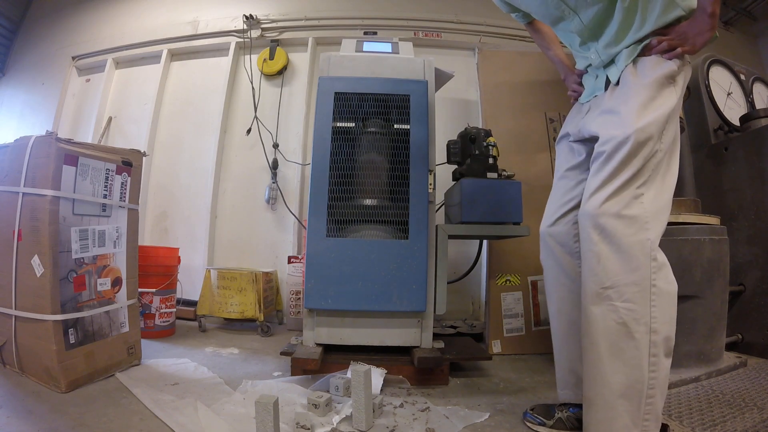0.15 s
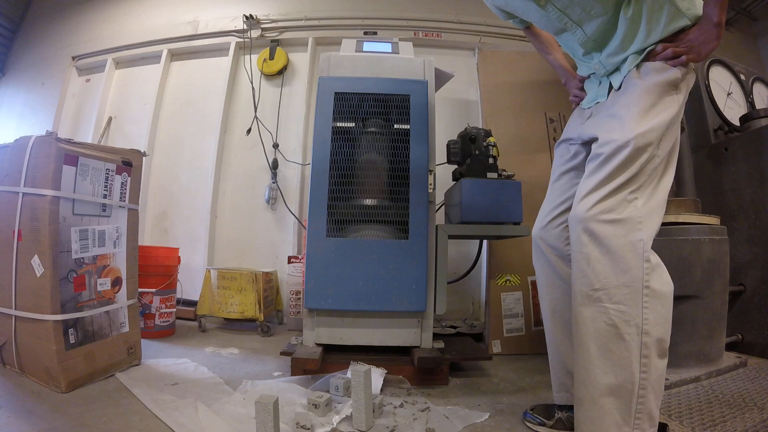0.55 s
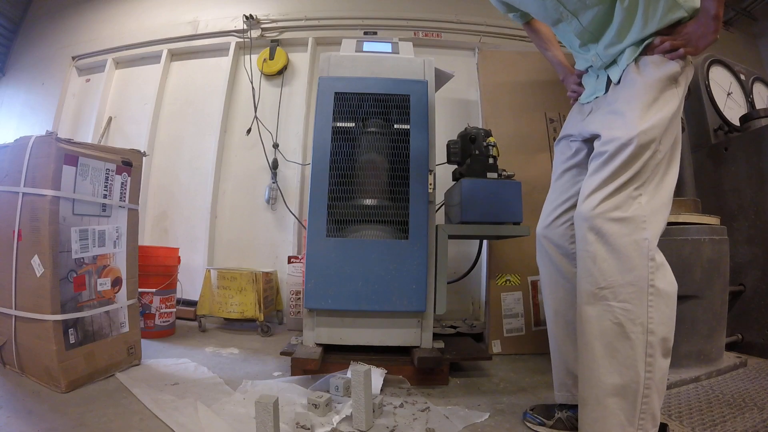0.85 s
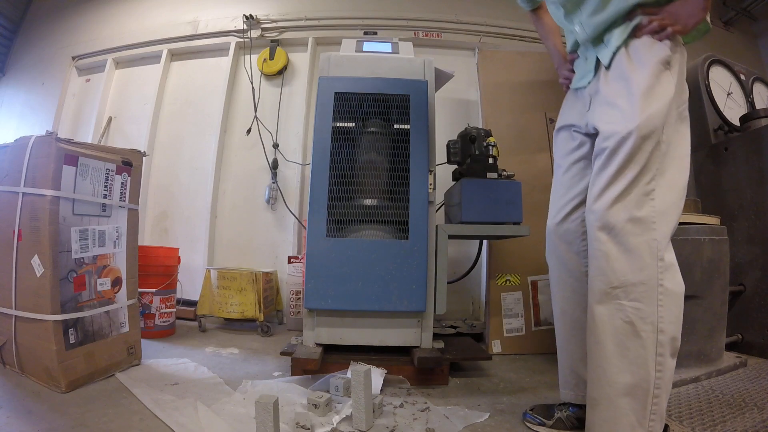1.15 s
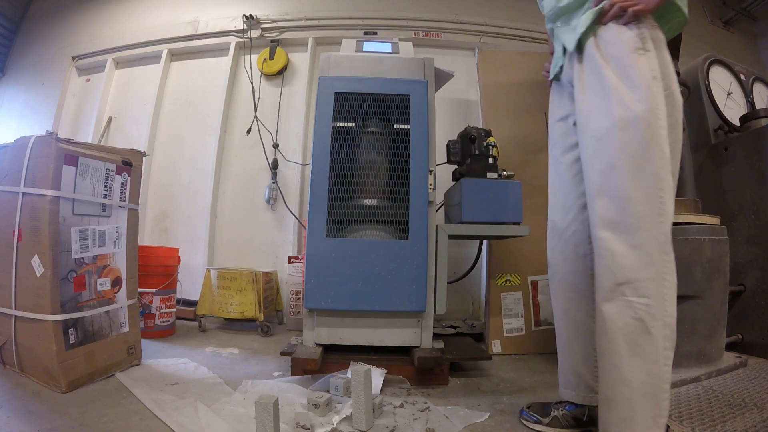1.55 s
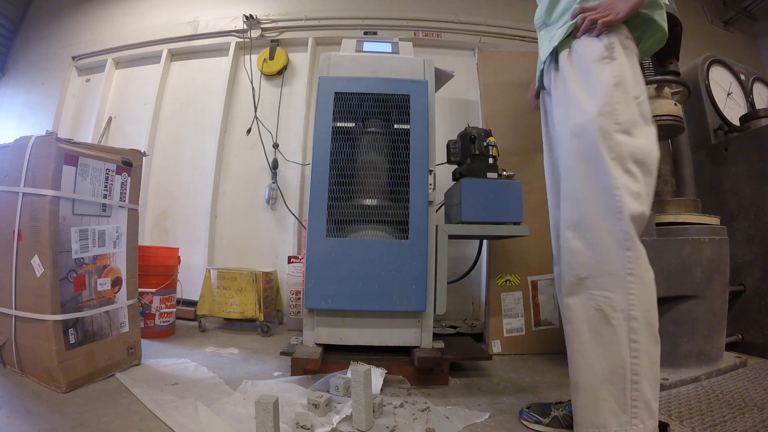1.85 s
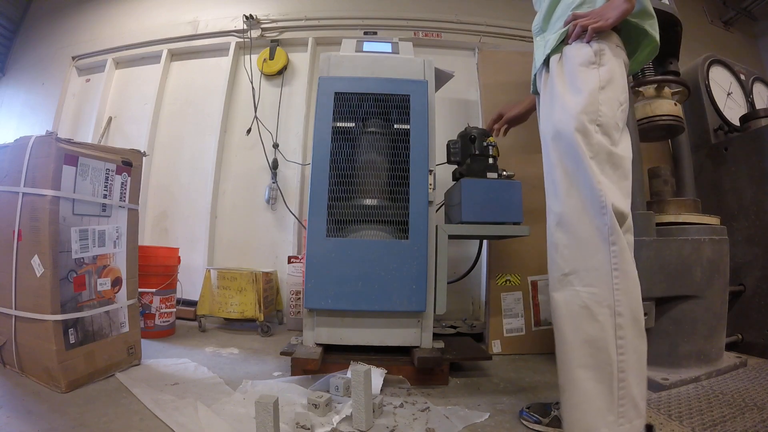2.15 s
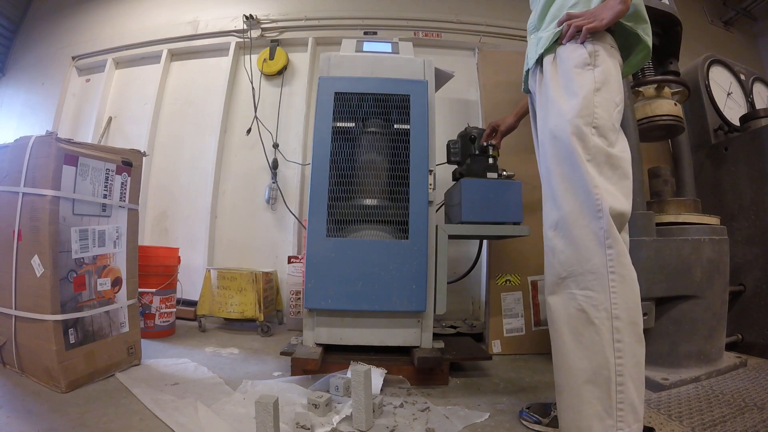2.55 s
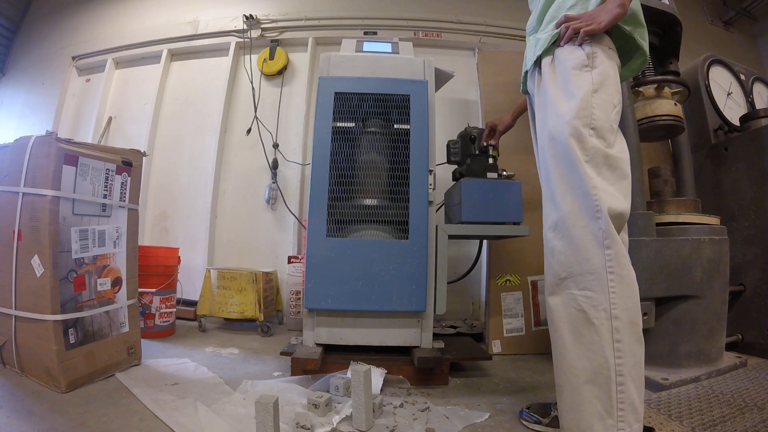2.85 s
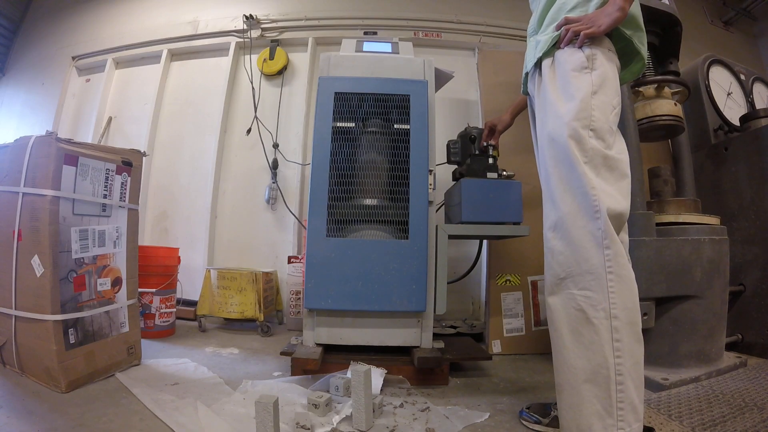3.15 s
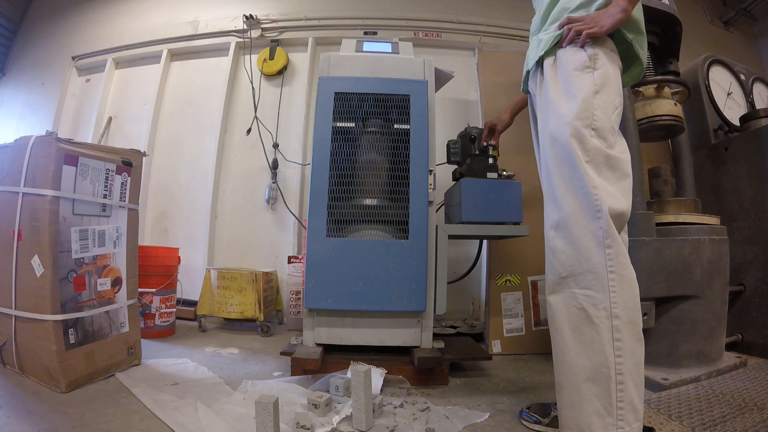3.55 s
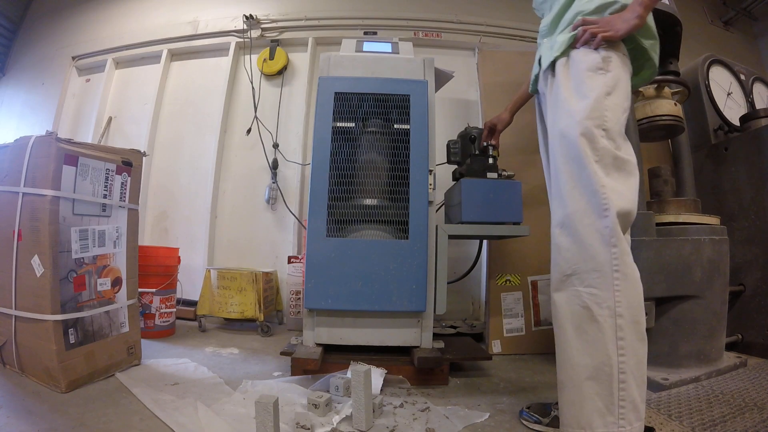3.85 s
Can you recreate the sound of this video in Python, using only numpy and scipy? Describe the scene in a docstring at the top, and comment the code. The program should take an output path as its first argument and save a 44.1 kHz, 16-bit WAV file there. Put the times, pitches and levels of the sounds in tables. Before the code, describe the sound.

A concrete cylinder bursts in a hydraulic press in a small workshop. From the start, the motor and pump hum steadily with a thin whine, easing slightly around 2 seconds. At about 3 seconds comes a loud, dull bang with a brief steel ring and short echo. Grit sprays and chunks thud down until about 3.3 seconds, trickling out by 3.8 seconds as the pump runs on.

```python
"""First comes the steady hum of a motor and hydraulic pump in a small workshop: a compression
tester is squeezing a concrete cylinder, and the piston tone eases as the load builds.
About three seconds in, the cylinder bursts with a bang that rings the steel frame.
Grit showers against the guard, bigger chunks thud down, and the pump runs on."""
import sys
import numpy as np
from scipy import signal
from scipy.fft import rfft, irfft, next_fast_len
from scipy.io import wavfile
from scipy.ndimage import map_coordinates

SR = 44100
rng = np.random.default_rng(int(sys.argv[2]) if len(sys.argv) > 2 else 0)


def unload_audio(sound):
    """Save the sound as a 16-bit wav file, at the path given as the first command line argument."""
    columns = np.transpose(np.atleast_2d(sound))
    # keep every value between -1 and 1, then stretch to whole-number steps
    steps = np.round(np.clip(columns, -1, 1) * 32767)
    wavfile.write(sys.argv[1], SR, steps.astype(np.int16))


N = 176400
SHAFT_HZ, BREAK_S = 29.613, 2.9875  # the pump's starting speed; when the cylinder bursts

# the pump's main tones (order [cycles per shaft turn], relative level [dB])
PUMP_TONES = [(6, -24), (11, -24), (12, -1), (13, -13.0), (14, -24.5), (16, -28.5), (18, -28.0),
              (19, -32.5), (23, -36), (24, -20.5), (26, -30), (29, -43), (30, -15), (31, -41.5),
              (32, -33.5), (33, -29.5), (34, -32.0), (35, -32), (36, -15.5), (37, -30.5), (38, -22.5),
              (39, -23), (40, -20.5), (41, -21), (42, -27.0)]
# how the piston tone changes with the load (time [s], level change [dB])
PISTON_LEVEL = [(0, 3), (1.1, 2.5), (2.3, -2.2), (2.95, -2.7), (3.9, -1.8)]
# the pump's thin whines (order [cycles per shaft turn], relative level [dB])
WHINE_TONES = [(54, -35.5), (62, -43), (65, -38.5), (96, -40), (100, -40), (102, -40), (103, -40),
               (114, -40), (116, -37)]
# the motor's mains hum (frequency [Hz], level [dB])
MOTOR_TONES = [(120, -55.5), (240, -52)]
# the pump's high buzz (frequency [Hz], typical level of each tone [dB])
BUZZ_SPECTRUM = [(1300, -69), (1600, -83), (2000, -82), (2400, -86), (3000, -82.5), (3450, -82),
                 (3700, -93), (5000, -89.5), (8000, -99)]
# rushing air and oil (frequency [Hz], relative level [dB])
RUSH_SPECTRUM = [(15, -5), (40, 3.5), (100, -4.5), (230, -14), (370, -5.5), (450, -11), (650, -17),
                 (1150, -12), (1520, -32), (2500, -30.5), (3200, -32), (3900, -33.5), (5200, -35),
                 (8000, -36), (10000, -41), (13000, -55)]
# the frame's first jolt as the load drops (frequency [Hz], level [dB], time to fade 60 dB [s])
JOLT_TONES = [(85, -26, .09), (210, -19, .05), (350, -15, .08), (580, -9, .06), (680, -14, .11)]
# the quick stages of the split (time after the break [s], relative level [dB])
CRACK_STAGES = [(0, -3.5), (.009, 0.5), (0.021, -7.5)]
# the bang of the concrete (frequency [Hz], relative level [dB])
BANG_SPECTRUM = [(20, -19), (60, -10), (150, -9.5), (330, -1), (650, -1.5), (850, 0.5), (1100, -1.5),
                 (1500, -21.5), (2500, -30), (4000, -29.5), (8000, -64), (13000, -56)]
# the ringing steel frame and guard (frequency [Hz], relative level [dB], time to fade 60 dB [s])
FRAME_TONES = [(213, -18, 0.81), (297.5, 0.5, 0.43), (314, -8.5, 0.34), (544, -14, 0.66), (565, -16, 0.9),
               (645, -6.5, 0.27), (746, -17, 0.51), (750, -11.5, 1), (843, 2, 0.14), (965, -10, 0.32),
               (1124, -6, 0.15), (1170, -9, .2)]
# the thin ping of the steel loading plate (frequency [Hz], relative level [dB])
PLATE_TONES = [(3354, 1.5), (4463, -1.5), (5577, -9), (6799, -18), (11690, -16), (12970, -8.5)]
# how the shower of fragments swells and dies (time [s], relative level [dB])
SHOWER_LEVEL = [(2.988, -12), (3.05, -7), (3.085, -4), (3.115, -4.5), (3.155, -2.5), (3.22, -1.5),
                (3.29, -15.5), (3.46, -20.5), (3.6, -22.5), (3.8, -42), (4, -43.5)]
# grit hitting the guard (frequency [Hz], relative level [dB])
GRIT_SPECTRUM = [(800, -26.5), (1500, 8), (2030, 3.5), (2700, -9), (3100, 4), (3500, 1.5), (3900, -5.5),
                 (4700, -1.5), (6100, -9.5), (7800, -7), (9000, -13.5), (11500, -20.5), (13200, -20)]
# stones hitting the steel tray (frequency [Hz], relative level [dB])
STONE_SPECTRUM = [(40, -9), (100, -3.5), (210, 5.5), (350, -7.5), (560, 0.5), (700, -8), (900, 1.5),
                  (1240, 3.5), (1420, -2), (1600, -14), (2200, -15), (4000, -38)]
# big chunks landing (time [s], level [dB], pitch of the thud [Hz])
CHUNK_LANDINGS = [(3.064, -18, 312), (3.088, -20.5, 314), (3.174, -14, 201), (3.206, -15.5, 221),
                  (3.251, -22, 212), (3.288, -27, 213)]
# the workshop's echo (frequency [Hz], time to fade 60 dB [s])
ROOM_FADE = [(100, 0.8), (400, 0.71), (1200, 0.8), (4000, 0.78), (12000, 0.37)]


def amp(db):
    """Turn decibels into a number to multiply by."""
    return 10 ** (np.asarray(db) / 20)


def along(points, hz):
    """Read between (frequency, value) points on a log frequency scale."""
    freqs, values = np.transpose(points)
    return np.interp(np.log(hz + 1), np.log(freqs + 1), values)


def clock():
    """The time of every sample, in seconds."""
    return np.arange(N) / SR


def curve(rows):
    """Join (time, value) points with straight lines."""
    return np.interp(clock(), *np.transpose(rows))


def wobble(per_s):
    """A smooth curve through per_s random values a second."""
    return map_coordinates(rng.standard_normal(int(N * per_s / SR) + 4), [clock() * per_s])


def coloured(x, spectrum):
    """Filter x with the given spectrum, then scale it to an average power of 1."""
    size = 2 * next_fast_len(N // 2 + SR // 4)
    gains = amp(along(spectrum, np.fft.rfftfreq(size, 1 / SR)))
    # folding the cepstrum makes the filter ring after each hit, never before it
    cepstrum = irfft(np.log(gains), size)
    cepstrum[1:size // 2] *= 2
    cepstrum[size // 2 + 1:] = 0
    shaped = irfft(rfft(x, size) * np.exp(rfft(cepstrum)), size)[:N]
    return shaped / np.sqrt(np.mean(shaped ** 2) + 1e-20)


def tone(cycles):
    """A sine wave of average power 1 that starts anywhere in its cycle."""
    return np.sqrt(2) * np.sin(2 * np.pi * (cycles + rng.random()))


def strike(start, attack_s, fade_s):
    """The loudness of a blow: it rises quickly, then falls 60 dB in fade_s."""
    age = np.maximum(clock() - start, 0)
    return (1 - np.exp(-age / attack_s)) * np.exp(-np.log(1000) * age / fade_s)


def ring(start, hz, attack_s, fade_s):
    """One fading tone of a struck object."""
    return strike(start, attack_s, fade_s) * np.sin(2 * np.pi * hz * (clock() - start))


def motor():
    """The electric motor hums at multiples of the mains frequency."""
    return sum(amp(db) * tone(hz * clock()) for hz, db in MOTOR_TONES)


def pump_tones(turns):
    """Hum and whine locked to the shaft; the top of the hum grows as the piston tone eases."""
    piston_order, first_rattle_order = 12, 38
    piston_db = curve(PISTON_LEVEL)
    hum = np.zeros(N)
    for order, db in PUMP_TONES:
        # the other tones flutter, the higher ones more
        change_db = piston_db if order == piston_order else .03 * order * wobble(per_s=18)
        if order >= first_rattle_order:
            change_db = change_db - .41 * piston_db
        hum += amp(db + change_db) * tone(order * turns)
    whine = sum(amp(db) * tone(order * turns) for order, db in WHINE_TONES)
    return amp(-36) * (hum + whine)


def pump_rush(turns):
    """Air and oil rush along, pulsing gently once per shaft turn."""
    noise = coloured(rng.standard_normal(N), RUSH_SPECTRUM)
    return amp(-50) * noise * (1 + .067 * tone(turns))


def pump_buzz(turns, size=8192):
    """The pump's fine rattle, the same on every turn of the shaft."""
    orders = np.setdiff1d(np.arange(43, 270), [order for order, _ in WHINE_TONES])
    level_db = along(BUZZ_SPECTRUM, orders * SHAFT_HZ) + 2.5 * rng.standard_normal(len(orders))
    spectrum = np.zeros(size // 2 + 1, complex)
    spectrum[orders] = amp(level_db) * np.exp(2j * np.pi * rng.random(len(orders)))
    one_turn = irfft(spectrum) * size / np.sqrt(2)
    return np.interp(turns, np.arange(size) / size, one_turn, period=1)


def pump():
    """One shaft drives all the pump's sounds, slowing a touch and turning a little unevenly."""
    speed_hz = SHAFT_HZ - .009 * clock()
    turns = np.cumsum(speed_hz) / SR + .001 * wobble(per_s=12)
    return pump_tones(turns) + pump_rush(turns) + pump_buzz(turns)


def fracture():
    """The concrete splits in quick stages that blur into one dull bang."""
    stages = sum(amp(db) * strike(BREAK_S + delay, attack_s=.0011, fade_s=.11)
                 for delay, db in CRACK_STAGES)
    return amp(-14.5) * stages * coloured(rng.standard_normal(N), BANG_SPECTRUM)


def steel_ring(attack_s=.0012):
    """Suddenly freed of the load, the frame jolts and rings, and the loading plate pings."""
    jolt = -sum(amp(db) * ring(BREAK_S, hz, attack_s=.0006, fade_s=fade_s)
                for hz, db, fade_s in JOLT_TONES)
    frame = sum(amp(db) * rng.choice([-1, 1]) * ring(BREAK_S, hz, attack_s, fade_s)
                for hz, db, fade_s in FRAME_TONES)
    plate = sum(amp(db) * ring(BREAK_S, hz, attack_s, fade_s=.48) for hz, db in PLATE_TONES)
    return jolt + amp(-19.5) * frame + amp(-42) * plate


def impacts(per_s, spread_db):
    """Tiny hits of uneven size at random times."""
    hits = rng.random(N) < per_s / SR
    signs = rng.choice([-1, 1], N)
    sizes = amp(spread_db * np.clip(rng.standard_normal(N), -2, 2))
    return hits * signs * sizes


def shower():
    """Grit sprays against the guard and stones hit the tray, then both trickle out."""
    level_db = curve(SHOWER_LEVEL)
    grit = coloured(impacts(per_s=2500, spread_db=3), GRIT_SPECTRUM)
    stones = coloured(impacts(per_s=600, spread_db=2.5), STONE_SPECTRUM)
    spray = amp(-30.5 + level_db) * grit + amp(-24 + .87 * level_db) * stones
    return spray * (clock() > BREAK_S)


def chunks():
    """Big pieces land, each with a low thud and a stony knock."""
    out = np.zeros(N)
    for start, db, hz in CHUNK_LANDINGS:
        thud = ring(start, hz, attack_s=.002, fade_s=.13)
        noise = coloured(rng.standard_normal(N), STONE_SPECTRUM)
        knock = strike(start, attack_s=.002, fade_s=.11) * noise
        out += amp(db) * (thud + amp(-9.5) * knock)
    return out


def with_echo(x, echo_db):
    """A sound plus its echo in the workshop, where each frequency fades at its own speed."""
    hz, t, noise = signal.stft(rng.standard_normal(SR), SR, nperseg=256)
    fade = np.exp(-np.log(1000) * t / along(ROOM_FADE, hz)[:, None])
    tail = signal.istft(noise * fade, SR, nperseg=256)[1]
    tail = np.pad(tail, (SR // 200, 0))  # the echo arrives 5 ms late
    echo = signal.fftconvolve(x, tail / np.linalg.norm(tail))[:N]
    return x + amp(echo_db) * echo


def scene():
    """The machine runs throughout; the burst and the rubble echo around the workshop."""
    machine = motor() + pump()
    burst = with_echo(fracture() + steel_ring(), echo_db=-7)
    rubble = with_echo(shower(), echo_db=-3.5) + with_echo(chunks(), echo_db=-12)
    return (machine + burst + rubble)[None]


def record(dry):
    """Cut away the very highest treble."""
    top_hz = 13600
    size = next_fast_len(N + SR // 2)
    kept = np.fft.rfftfreq(size, 1 / SR) < top_hz
    return irfft(rfft(dry, size) * kept, size)[..., :N]


dry = scene()
out = record(dry)
unload_audio(out)
```